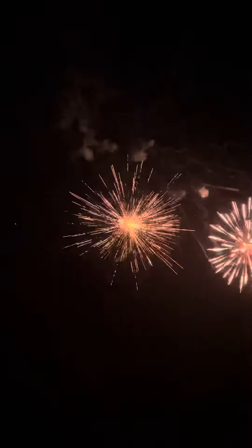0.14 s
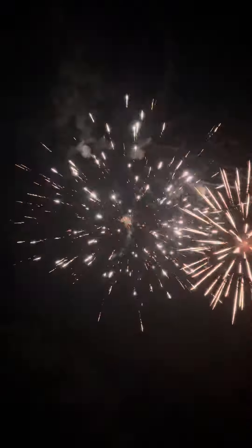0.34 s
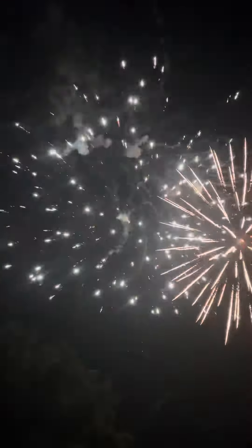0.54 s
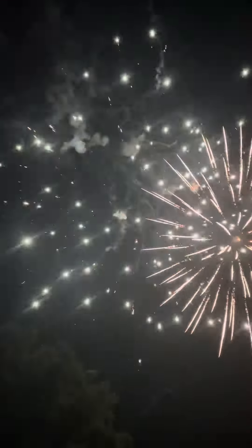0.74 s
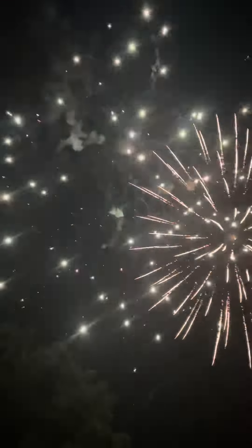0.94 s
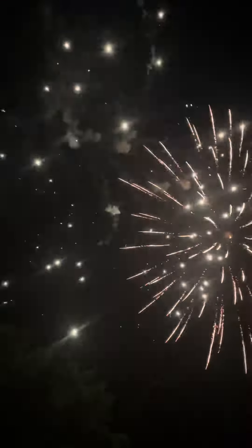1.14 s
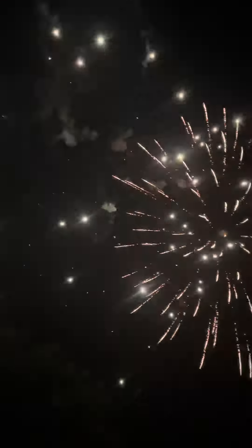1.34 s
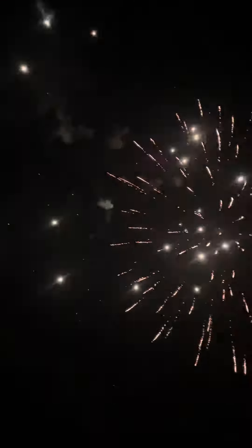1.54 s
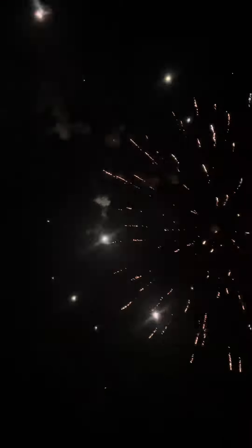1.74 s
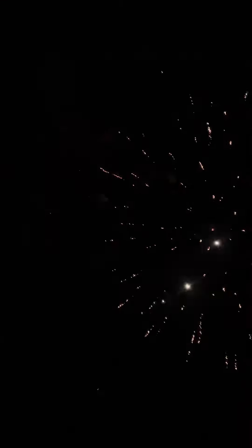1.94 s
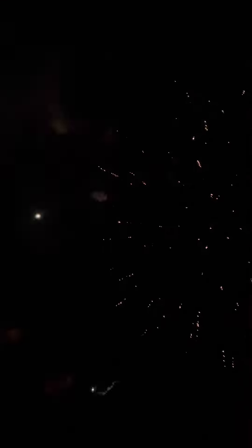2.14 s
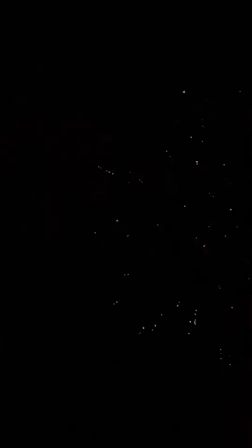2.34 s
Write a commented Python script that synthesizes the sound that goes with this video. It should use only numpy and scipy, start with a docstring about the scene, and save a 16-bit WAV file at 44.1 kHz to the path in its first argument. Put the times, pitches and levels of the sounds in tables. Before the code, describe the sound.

Firework shells burst loudly over open ground, a rough crack leading into two heavy booms, followed by dull echo thumps and fading rumble, faint insect-like rasps, and a late muffled bang on a handheld stereo microphone.

```python
"""Open ground at night, with aerial shells bursting overhead. Loud pressure pulses each return off the ground,
with a slow boom and a ragged noise crack; a rough noisy onset comes just before the first. Trees and distant
walls send back a swelling, dying rumble of banded noise, with single dull thumps that are low-passed pulses.
Behind lie faint insect-like rasps, one small tick and a drifting night air, all filtered noise. A handheld
microphone smears each pulse into a falling chirp. The two channels differ in level and phase, and at 9-12 kHz
they are opposed."""
import sys
import numpy as np
from scipy import signal
from scipy.fft import rfft, irfft
from scipy.io import wavfile

SR = 44100
rng = np.random.default_rng(int(sys.argv[2]) if len(sys.argv) > 2 else 0)


def waveform_to_disk(signal):
    """Save audio, clipped to [-1, 1], as 16-bit WAV at the path in sys.argv[1]."""
    frames = np.transpose(np.atleast_2d(signal))
    scaled = np.clip(frames, -1, 1) * 32767
    samples = np.round(scaled).astype(np.int16)
    wavfile.write(sys.argv[1], SR, samples)


N = 110250

# Anchor frequencies of the level courses that shape banded noise: [Hz]
ROLL_HZ = [60, 250, 700, 2500]


def from_db(db):
    """Turn dB into an amplitude gain."""
    return 10 ** (np.asarray(db) / 20)


def rms_one(x):
    """Scale to rms 1."""
    return x / np.sqrt(np.mean(x ** 2) + 1e-20)


def at_hz(points, hz):
    """Read a (Hz, value) table along a log-frequency axis."""
    table_hz, values = np.array(points).T
    return np.interp(np.log(hz), np.log(table_hz), values)


def band_filter(order, low_hz, high_hz):
    """Butterworth band-pass sections."""
    return signal.butter(order, [low_hz, high_hz], "band", fs=SR, output="sos")


def drift(rate_hz):
    """Slow random wander of rms about 1: noise through a two-pole low-pass, run at a fortieth of the sample rate."""
    r = np.exp(-2 * np.pi * rate_hz * 40 / SR)
    noise = rng.standard_normal(N // 40 + 2002)
    slow = signal.lfilter([1], [1, -2 * r, r * r], noise)[2000:]   # skip the filter's start-up
    return np.interp(np.arange(N) / 40, np.arange(len(slow)), rms_one(slow))


def pulse(start_s, peak_db, positive_ms, corner_hz):
    """Blast wave: a sudden push that sags into suction, then dulled above a corner."""
    u = (np.arange(N) / SR - start_s) * 1000 / positive_ms
    shape = np.where(u >= 0, (1 - u) * np.exp(-np.clip(u, 0, 40)), 0)
    dull = signal.butter(2, min(corner_hz, .45 * SR), fs=SR, output="sos")
    return from_db(peak_db) * signal.sosfilt(dull, shape + 1e-18)


def dying(start_s, swell_s, t60_s):
    """Envelope that swells from its start while an exponential decay pulls it down."""
    u = np.clip(np.arange(N) / SR - start_s, 0, None)
    return (1 - np.exp(-u / swell_s)) ** 2 * from_db(-60 * u / t60_s)


def diffuse(pair):
    """Mix two unrelated noises into a stereo pair with a set likeness at each frequency."""
    # Likeness of the channels in diffuse sound, before their phase is parted: hz [Hz], likeness [0-1]
    likeness = [(30, 1), (200, .98), (320, .9), (900, .92), (1300, .55), (1900, .3), (2600, .55),
                (4700, .25), (6000, .72), (8000, .75), (8800, 1), (11600, 1), (12500, .5), (14000, 1),
                (17000, 1)]
    mid, side = rfft(pair)
    alike = at_hz(likeness, np.fft.rfftfreq(N, 1 / SR) + 1)
    return irfft(np.sqrt((1 + alike) / 2) * mid + np.sqrt((1 - alike) / 2) * side * [[1], [-1]], N)


def banded_noise(spectrum, courses, air_loss, patchy_db, lumpy_db):
    """Diffuse noise in third-octave bands, lumpier in the bass; each band follows level courses given at ROLL_HZ."""
    lumpy_hz = 900   # the shared lumps fade out around here
    edges = 28 * 2 ** np.arange(0, 9.4, 1 / 3)
    centres = np.sqrt(edges[1:] * edges[:-1])
    white = rng.standard_normal((2, 2, N))
    lumps = drift(25)
    treble_fall_db = courses[-1] - courses[-1].max()
    out = 0
    for k, (low, high) in enumerate(zip(edges, edges[1:])):
        hz = centres[k]
        # share of each anchor course in this band
        share = [np.interp(np.log(hz), np.log(ROLL_HZ), one) for one in np.eye(len(ROLL_HZ))]
        db = np.dot(share, courses) + at_hz(spectrum, hz)
        db = db + air_loss * hz / 10000 * treble_fall_db   # air takes the highs sooner
        db = db + patchy_db * drift(8)
        db = db + lumpy_db * lumps / (1 + (hz / lumpy_hz) ** 2) ** 2
        # neighbouring bands use unrelated noise
        out = out + from_db(db) * signal.sosfilt(band_filter(2, low, high), white[k % 2])
    power = np.sum(from_db(at_hz(spectrum, centres)) ** 2 * np.diff(edges)) * 2 / SR
    return diffuse(out) / np.sqrt(power)


def blasts():
    """Each row gives a pulse, a duller ground bounce, the slow push of expanding gas and a ragged crack."""
    # Loud pulses, with a rough noisy onset just before the first; levels are before filtering
    # and microphone colour: start_s [s], peak_db [dB], positive_ms [ms], corner_hz [Hz],
    # bounce_delay_ms [ms], bounce_change_db [dB], crack_db [dB], crack_corner_hz [Hz],
    # crack_lead_ms [ms], crack_t60_s [s], boom_db [dB]
    loud_pulses = [(0.2026, -8, 1.42, 2000, 2.1, -35.5, -12.5, 2500, 2.4, .05, -66),
                   (0.2077, -2, 1.06, 11200, 6.52, -8.5, -24.5, 3000, 0.078, .025, -9),
                   (0.302, -3, 1.9, 8500, 8.2, -9, -14, 4000, .1, .025, -8.5),
                   (2.2215, -7.5, 1.6, 485, 10.0, -13, -13, 8000, 1.38, .015, -28)]
    # Microphone colour of these direct sounds: hz [Hz], level_db [dB]
    mic_colour = [(20, -12.5), (60, 14), (300, 13), (500, 9.5), (1000, 3.5), (1700, 4), (3000, 4.5),
                  (6000, 2), (9000, 9), (13000, 19), (17000, 15.5)]
    # Extra phase by which the left channel leads in these direct sounds: hz [Hz], lead [radians]
    direct_lead = [(60, -0.14), (100, -0.16), (150, -0.69), (220, -0.49), (320, -1.2), (450, 0.75),
                   (640, 0.99), (1300, 1.6), (1900, 0.36), (2600, 0.034)]
    boom_ms, boom_hz = 13.7, 93   # positive phase and corner
    crack_rise_s = 0.00098
    crack_tilt_hz = 1992          # the crack falls off gently above this
    tilt = signal.butter(1, crack_tilt_hz, fs=SR)
    hiss = rms_one(signal.lfilter(*tilt, rng.standard_normal((2, N))))
    pulses, cracks = 0, 0
    for s, db, ms, hz, lag_ms, bounce_db, crack_db, crack_hz, lead_ms, t60, boom_db in loud_pulses:
        bounce_s = s + lag_ms / 1000
        pulses = pulses + pulse(s, db, ms, hz)
        pulses = pulses + pulse(bounce_s, db + bounce_db, ms, 0.5 * hz)
        pulses = pulses + pulse(s, boom_db, boom_ms, boom_hz)
        # the crack starts just ahead of the pulse and repeats with the bounce
        edge = dying(s - lead_ms / 1000, crack_rise_s, t60)
        edge = edge + from_db(bounce_db) * dying(bounce_s, crack_rise_s, t60)
        ragged = signal.sosfilt(band_filter(3, crack_hz / 7, crack_hz), hiss)
        cracks = cracks + from_db(crack_db) * edge * ragged
    hz = np.fft.rfftfreq(N, 1 / SR) + 1
    right_lag = np.exp(-1j * at_hz(direct_lead, hz) * [[0], [1]])
    return irfft(rfft(pulses + diffuse(cracks)) * from_db(at_hz(mic_colour, hz)) * right_lag, N)


def thumps():
    """Single echoes and far reports: dull copies of the blast pulse."""
    # Thumps; peaks are before dulling: start_s [s], peak_db [dB], corner_hz [Hz], positive_ms [ms]
    single_echoes = [(0.22, -20, 100, 6.9), (0.264, -15, 120, 8.4), (0.317, -44, 100, 10),
                     (0.5, -20.5, 347, 1.1), (0.634, -7.5, 203, 0.83), (.759, -16, 203, 0.73),
                     (0.868, -30, 300, 3.7), (1.044, -26.5, 408, 1.0), (1.209, -36, 200, 2.7),
                     (1.227, -26, 182, 1.8), (1.293, -32, 200, 3), (1.69, -40.5, 251, 2.1),
                     (1.936, -28, 205.6, 1.2), (2.053, -26.5, 1183, 1.1), (2.297, -18.5, 250, 1.7),
                     (2.331, -14, 250, 1.7), (2.487, -24, 200, 1.7)]
    return sum(pulse(s, db, ms, hz) for s, db, hz, ms in single_echoes)


def rolls():
    """Scattered echoes add in power as rumbling noise; bass and treble die at their own rates."""
    # Rolls: start_s [s], swell_s [s], low_t60_s [s], treble_t60_s before air loss [s],
    # then one level_db for each of ROLL_HZ [dB]
    echo_rolls = [(0.213, 0.0025, 0.43, 2.4, -25, -21.5, -29, -28.5),
                  (.31, .004, 0.2, 0.27, -14.5, -35.5, -28.5, -30),
                  (0.359, 0.045, 2.05, 1.33, -30.5, -25, -26, -25.5),
                  (2.221, 0.005, .9, 1.073, -23.5, -27, -30.5, -23.5)]
    # Relative spectrum of the rumble: hz [Hz], density_db [dB per Hz]
    roll_spectrum = [(30, -32), (45, -7), (65, 2.5), (150, -0.5), (320, -4.5), (640, -5.5), (1300, -13),
                     (2600, -16.5), (4700, -21), (7500, -26.5), (9500, -25), (12500, -38.5), (14500, -20),
                     (15500, -87), (16500, -81)]
    air_loss = 0.76   # extra share of the treble's fall added at 10 kHz
    last = len(ROLL_HZ) - 1
    powers = []
    for k in range(last + 1):
        power = 0
        for start_s, swell_s, low_t60, treble_t60, *levels_db in echo_rolls:
            t60 = low_t60 + (treble_t60 - low_t60) * k / last
            power = power + (from_db(levels_db[k]) * dying(start_s, swell_s, t60)) ** 2
        powers.append(power)
    courses = 10 * np.log10(np.array(powers) + 1e-12)
    return banded_noise(roll_spectrum, courses, air_loss, patchy_db=2.0, lumpy_db=2.0)


def chirps():
    """Faint insect-like rasps: narrow-band noise that swells and fades."""
    # Rasps; levels are before the swell: start_s [s], level_db [dB]
    rasps = [(1.22, -65), (1.70, -72.5), (1.85, -74)]
    centre_hz, width_hz, swell_s, t60_s = 5320, 500, 0.0073, 0.43
    band = band_filter(2, centre_hz - width_hz / 2, centre_hz + width_hz / 2)
    level = sum(from_db(db) * dying(s, swell_s, t60_s) for s, db in rasps)
    return level * rms_one(signal.sosfilt(band, rng.standard_normal((2, N))))


def tick():
    """One small tick close by: a bright scrap of band-passed noise with a fast start."""
    start_s, level_db, pitch_hz, t60_s = 1.519, -58.5, 10520, 0.09   # level before filtering
    band = band_filter(2, 0.55 * pitch_hz, 1.4 * pitch_hz)
    bright = signal.sosfilt(band, rng.standard_normal((2, N)))
    return from_db(level_db) * dying(start_s, .0005, t60_s) * bright


def night():
    """Far rumble and air hiss: diffuse noise whose low and treble levels drift apart."""
    # Relative spectrum of the open air: hz [Hz], density_db [dB per Hz]
    night_spectrum = [(30, -11.5), (45, -31.5), (65, 0.5), (150, -2.5), (320, -5), (640, -9), (1300, -20),
                      (2600, -26.5), (4700, -31.5), (7500, -44.5), (9500, -41), (12500, -45), (14500, -39),
                      (15500, -47.6), (16500, -52.5)]
    # Drift of the background: time_s [s], low_change_db [dB], treble_change_db [dB]
    night_drift = [(0, 0, -3.5), (.2, -8, 2), (1.0, 0, 3.5), (1.55, 0.5, 3.5), (1.62, -0.5, -1),
                   (2.0, 2.5, -1.5), (2.5, -2, -8)]
    level_db = -54.5   # before the drift
    time_s, low, treble = np.transpose(night_drift)
    t = np.arange(N) / SR
    low = level_db + np.interp(t, time_s, low)
    treble = level_db + np.interp(t, time_s, treble)
    return banded_noise(night_spectrum, np.array([low, low, low, treble]), 0, patchy_db=1.1, lumpy_db=1.3)


def scene():
    """Sum every layer, from the blasts to the night air."""
    return blasts() + thumps() + rolls() + chirps() + tick() + night()


def record(dry):
    """All-pass stages delay the bass, the channels differ in phase and level, peaks are rounded, the top is cut."""
    # Phase by which the left channel leads, opposed at 9-12 kHz: hz [Hz], lead [radians]
    left_lead = [(30, 0), (100, .3), (220, 1.0), (320, 2.0), (450, 2.9), (900, 3.7), (2600, 4.1),
                 (4700, 4.8), (6000, 6.7), (7500, 8.0), (8800, 3 * np.pi), (11600, 3 * np.pi),
                 (13800, 4 * np.pi), (17000, 4 * np.pi)]
    # Channel balance: hz [Hz], left_minus_right_db [dB]
    balance = [(65, 0), (150, 4), (320, 9), (640, 3), (1300, 3), (1900, -2), (2600, 0), (17000, 0)]
    smear_low_hz, smear_high_hz = 100, 2000   # span of the all-pass stages
    cutoff_hz = 16900                         # stop-band edge, 70 dB down from here up
    for stage_hz in np.geomspace(smear_low_hz, smear_high_hz, 9):
        bend = np.tan(np.pi * stage_hz / SR)
        a = (bend - 1) / (bend + 1)
        dry = signal.lfilter([a, 1], [1, a], dry)
    hz = np.fft.rfftfreq(N, 1 / SR) + 1
    left = from_db(at_hz(balance, hz) / 2)
    right = np.exp(-1j * at_hz(left_lead, hz)) / left
    channels = irfft(rfft(-dry) * [left, right], N)   # polarity flipped
    rounded = np.tanh(channels)
    return signal.sosfilt(signal.cheby2(12, 70, cutoff_hz, fs=SR, output="sos"), rounded)


dry = scene()
out = record(dry)
waveform_to_disk(out)
```